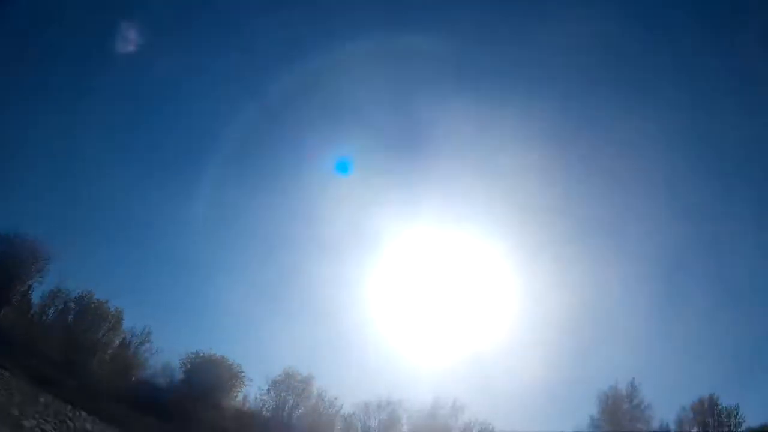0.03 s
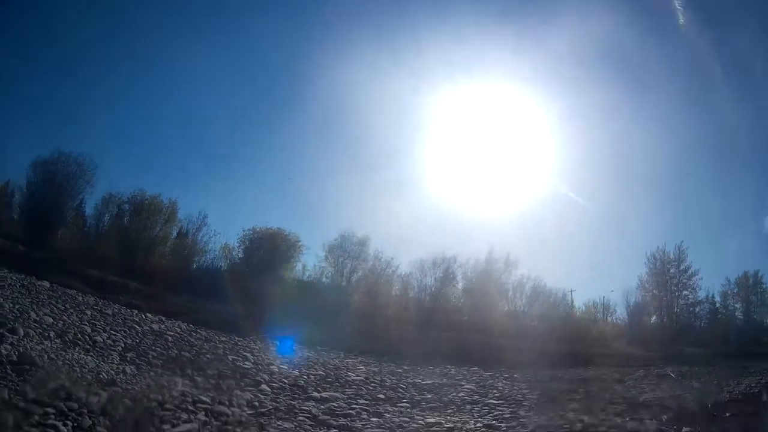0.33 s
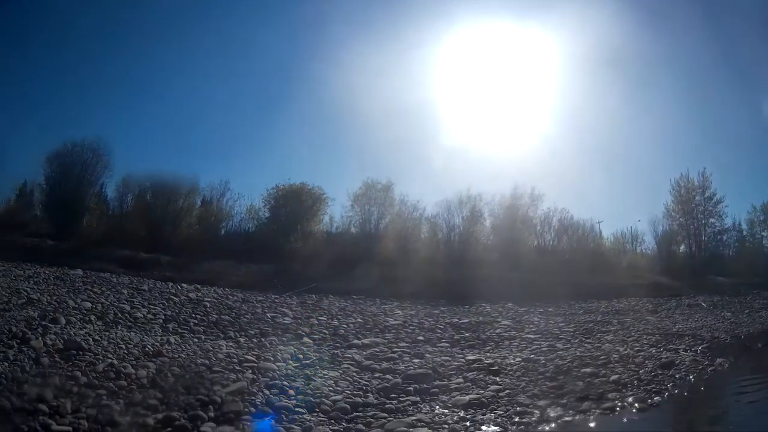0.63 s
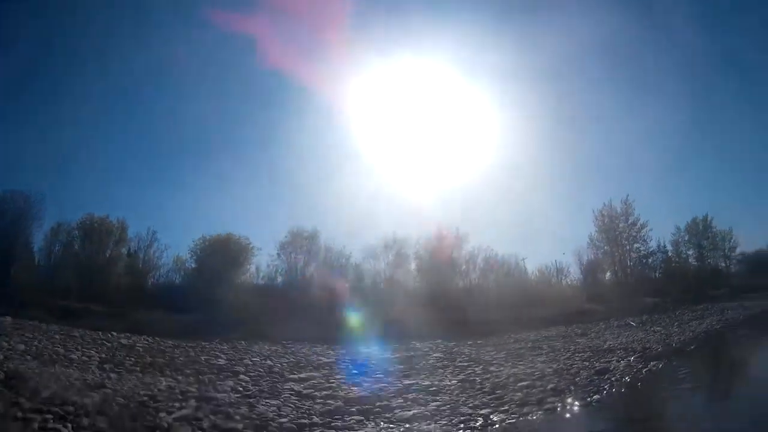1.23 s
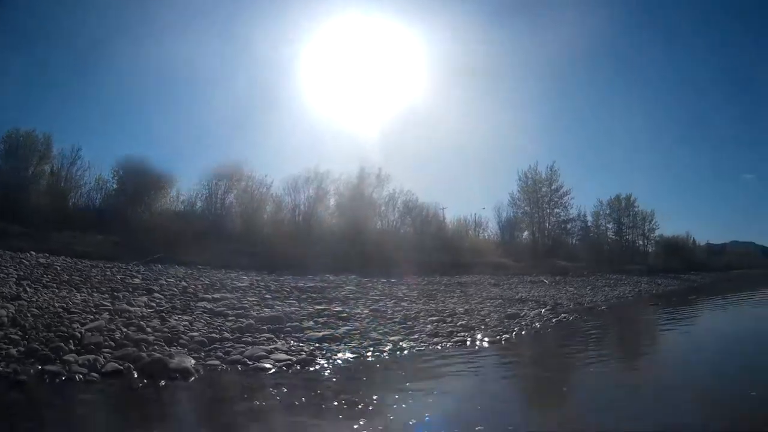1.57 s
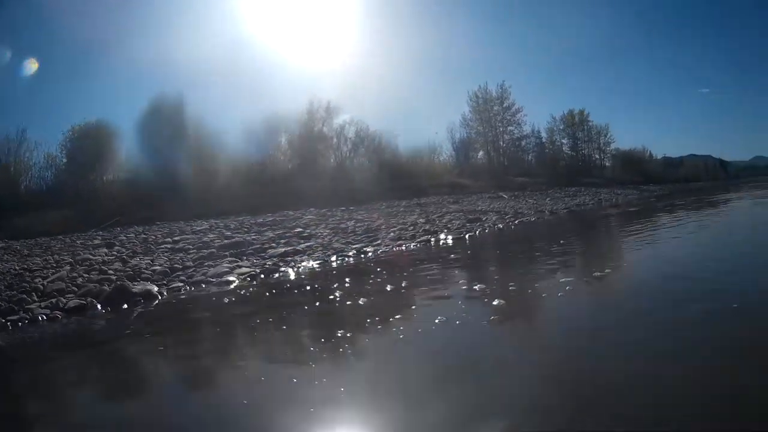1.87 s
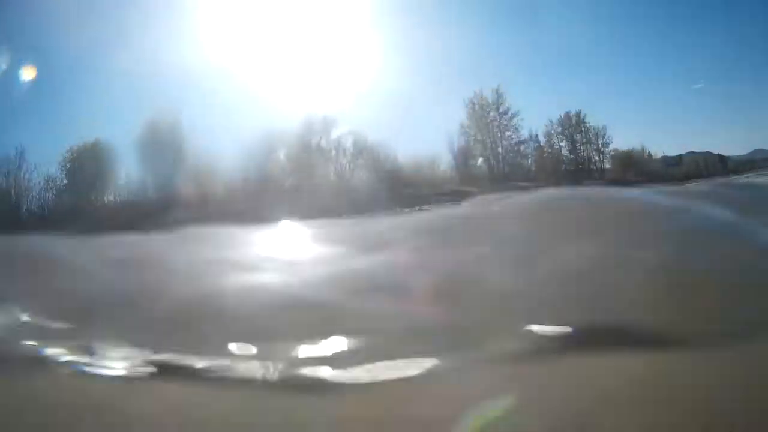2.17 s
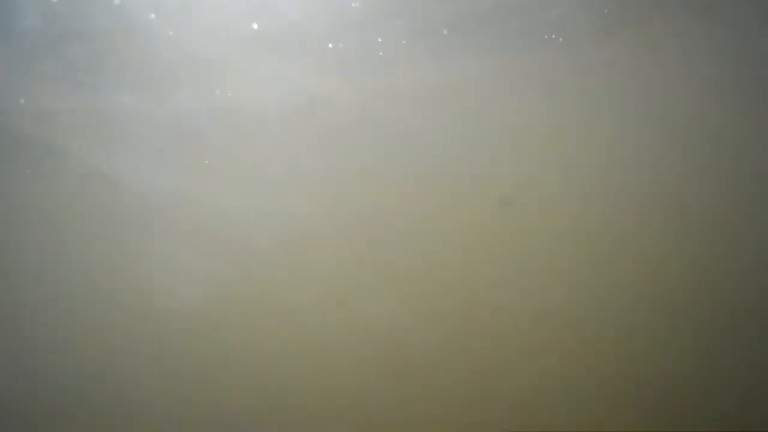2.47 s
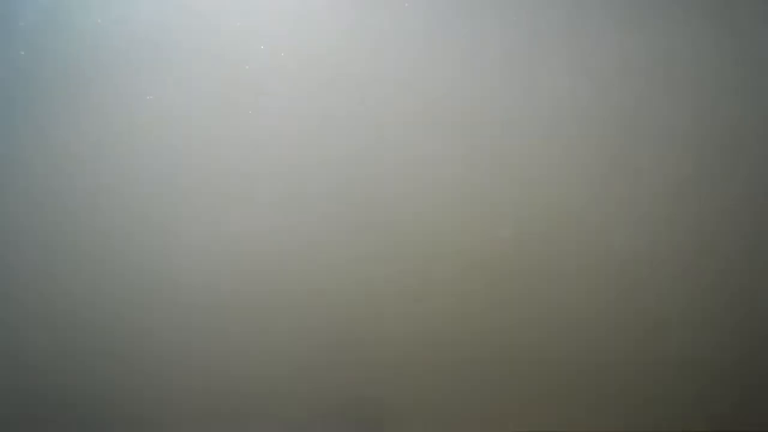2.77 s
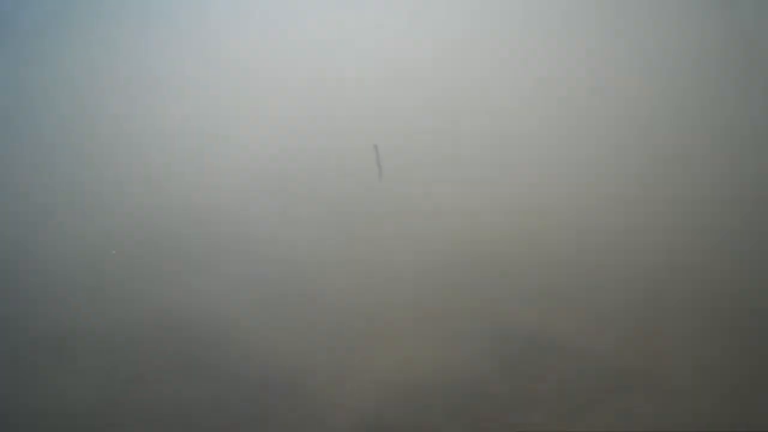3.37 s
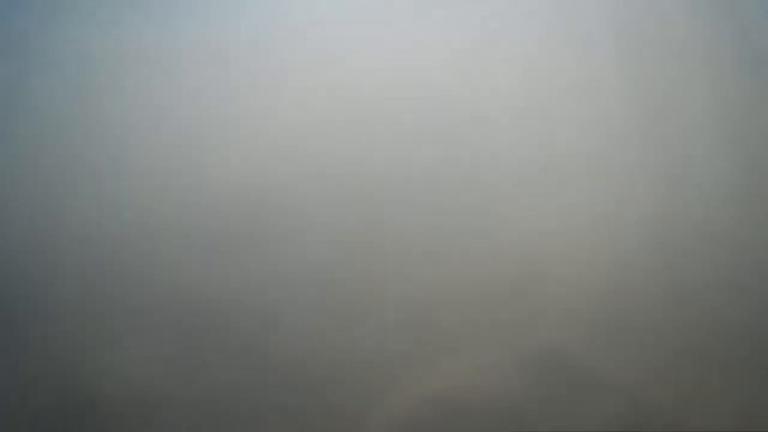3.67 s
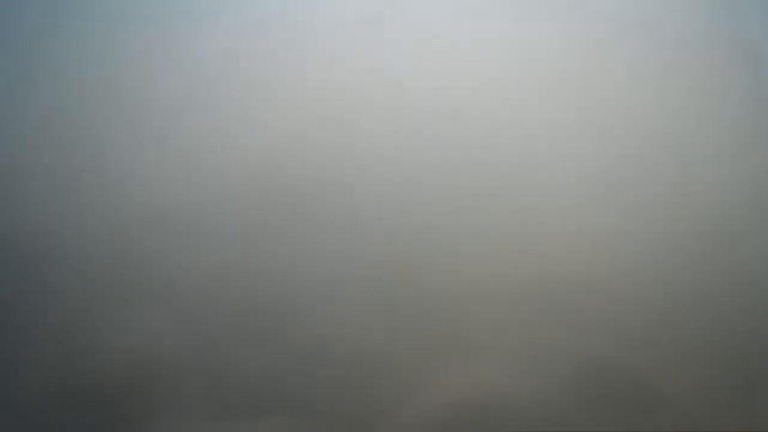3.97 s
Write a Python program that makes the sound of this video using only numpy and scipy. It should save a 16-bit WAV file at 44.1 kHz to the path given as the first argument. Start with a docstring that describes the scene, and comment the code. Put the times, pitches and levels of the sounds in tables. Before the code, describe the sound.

A close splash with bubbling is the main sound. In the first second, fingers knock and rub a camera case, with small creaks, clicks and low rumble. After a lull, the case hits the river at about 2.1 seconds: slaps, ticking spray and gurgling bubbles, fading by 2.8. A quiet, muffled underwater murmur with soft bumps, scuffs and faint hiss continues until 4 seconds.

```python
"""At a river's edge, a camera in a waterproof case is carried to the water and dipped under.
Fingers rub and tap the swaying case, exciting its resonances. The surface slaps it, spray ticks,
air pockets collapse, and bubbles ring as damped oscillators, the trapped air acting as a spring.
Below the surface a muffled rumble, soft bumps and scuffs, and the microphone's hiss remain."""
import sys
import numpy as np
from scipy import signal
from scipy.fft import rfft, irfft
from scipy.io import wavfile
from scipy.ndimage import uniform_filter1d

SR = 44100
rng = np.random.default_rng(int(sys.argv[2]) if len(sys.argv) > 2 else 0)


def output_pcm(signal):
    """Save a mono or channel-first signal as 16-bit PCM at the path in sys.argv[1].

    Samples are clipped to [-1, 1] before scaling.
    """
    pcm = np.clip(np.atleast_2d(signal).T, -1, 1) * 32767
    wavfile.write(sys.argv[1], SR, np.round(pcm).astype(np.int16))


N = 176400
TIME = np.arange(N) / SR

# bubbles pinched off at the case: t/s, f/Hz, level/dB, t60/s, swell/s
BUBBLES = [(2.068, 1360, -9.5, 0.015, 0.00065), (2.076, 1257, -14, 0.044, 0.0018),
           (2.0818, 458, -10, 0.038, 0.0001), (2.089, 1410, -14, 0.017, 0.00033),
           (2.124, 1694, 0, 0.033, 0.00045), (2.13, 1291, -14.5, 0.17, 0.0012),
           (2.1316, 3960, -1.5, 0.0065, 0.00045), (2.1315, 5850, -6, 0.0068, 0.00033),
           (2.1298, 7720, 4, 0.0025, 0.00019), (2.1331, 1950, -5, 0.013, 0.00045),
           (2.1473, 2520, 1, 0.0053, 0.00028), (2.1484, 4020, -2, 0.013, 0.00033),
           (2.1508, 1236, -4.5, 0.028, 0.001), (2.1625, 1154, -6.5, 0.014, .0005),
           (2.1799, 1427, 4.5, 0.021, 0.0021), (2.2005, 3330, -24, 0.015, 0.001),
           (2.2146, 1138, -7, 0.015, 0.00036), (2.219, 1185, -2.5, 0.0092, 0.00009),
           (2.2295, 1790, -1, 0.0073, 0.00044), (2.2608, 1750, -20, 0.015, 0.00058),
           (2.271, 2020, -19.5, 0.029, 0.0015), (2.2725, 3860, -25, 0.014, 0.001),
           (2.3155, 818, -7, 0.028, 0.0001), (2.3217, 3860, -13, 0.015, 0.000043),
           (2.383, 1830, -18, 0.015, 0.00037), (2.3824, 5570, -44, 0.074, 0.0002),
           (2.388, 666, -6.5, 0.0075, 0.00048), (2.417, 1664, -16, 0.02, 0.00056),
           (2.4408, 675, -4, 0.079, 0.00045), (2.458, 3140, -21, 0.013, 0.0006),
           (2.486, 491, -15, 0.12, 0.00047), (2.4847, 4130, -6.5, 0.0043, 0.00017),
           (2.506, 1200, -15.5, 0.023, 0.0023), (2.5174, 1235, -2, 0.023, 0.00033),
           (2.5171, 568, -4.5, 0.029, 0.00055), (2.5181, 866, -7, 0.053, 0.0008),
           (2.5262, 1895, -12, 0.032, 0.0007), (2.534, 1940, -4.5, 0.022, 0.0012),
           (2.534, 2630, -18, 0.02, 0.00047), (2.5576, 1780, -21, 0.028, .001),
           (2.566, 1950, -19, 0.02, 0.00071), (2.5688, 923, -14, 0.03, 0.00087),
           (2.5897, 1580, -26.5, 0.028, 0.00091), (2.624, 1296, -37.5, 0.16, 0.0027),
           (2.6515, 1207, -24, 0.022, 0.00018), (2.7302, 1350, -36, 0.049, 0.00047),
           (2.731, 1920, -44, 0.046, 0.0011), (2.7665, 1420, -22.5, 0.023, 0.00069),
           (3.878, 3630, -34, 0.017, 0.003)]
# water striking the case: t/s, f/Hz, level/dB, t60/s
SLAPS = [(2.0603, 60.3, -4.5, 0.018), (2.076, 138.5, -9, 0.051), (2.083, 51, -0.5, 0.11),
         (2.178, 297, -3.5, 0.007), (2.2190, 435, -24, 0.077), (2.284, 96, -10.5, 0.055),
         (2.3053, 730, -21, 0.027), (2.322, 90, -16, 0.06), (2.346, 76, -15, 0.058),
         (2.4410, 250, -1, 0.0054), (2.4835, 494, 2, 0.0076)]
# collapsing air pockets: t/s, level/dB, build-up/s
GULPS = [(2.3140, -0.5, 0.0008), (2.3341, -3, 0.0048), (2.3429, -10, 0.0035)]
# drops on the case: t/s, level/dB, centre f/Hz
DROPS = [(2.069, -18.5, 3800), (2.0773, -19, 7650), (2.092, -32, 3500), (2.108, -18, 3970),
         (2.12, -12, 10900), (2.1311, 2.5, 8050), (2.1323, -11, 6000), (2.1360, 3, 3060),
         (2.1345, -13, 9000), (2.1480, -7, 5200), (2.158, -18.5, 3880), (2.1725, -17.5, 8700),
         (2.2002, -19, 3480), (2.251, -20, 4440), (2.2608, -23.5, 6400), (2.269, -25.5, 6000),
         (2.3168, -17.5, 5370), (2.3814, -6, 5370), (2.3796, -17, 11200), (2.419, -19, 8200),
         (2.427, -15, 5250), (2.458, -21, 3470), (2.471, -19, 7400), (2.480, -13.5, 5430),
         (2.4846, -15.5, 5800)]
# churning surface: t/s, level/dB
CHURN_LEVEL = [(2.055, -48), (2.072, -27.5), (2.088, -28.5), (2.108, -41.5), (2.135, -29.5), (2.165, -31.5),
               (2.195, -32), (2.245, -39), (2.32, -30), (2.365, -38), (2.405, -49), (2.47, -33.5),
               (2.50, -39), (2.535, -33), (2.58, -40), (2.69, -69)]
# its spectrum: f/Hz, level/dB
CHURN_SPECTRUM = [(110, -2), (220, -5.5), (420, 3), (750, -1), (1400, -3.5), (2050, 0.5), (2400, -14),
                  (2900, -13), (3900, -9.5), (4900, -27.5), (8000, -36), (16000, -44.5)]
# its treble relative to its body: t/s, level/dB
CHURN_TREBLE = [(2.07, 0), (2.16, 7.5), (2.23, -1.5), (2.34, -18.5), (2.47, 6.5), (2.53, -2.5)]

# finger knocks: t/s, level/dB, cutoff f/Hz (higher for a harder tap)
KNOCKS = [(.1370, -10, 2670), (0.1475, -12.5, 1650), (0.2333, -12, 2040), (0.2435, -43, 2000),
          (0.299, -24, 3000), (.3595, -26.5, 4000)]
# normal modes of the case: f/Hz, level/dB, t60/s
CASE_MODES = [(227, -15, 0.025), (422, -2, 0.015), (623, -18, 0.012), (1310, -4, 0.011), (1580, 3, 0.0065),
              (1853, -2.5, 0.014), (3160, -3, 0.0075), (3720, -4, 0.012)]
# rubbing of the hand: t/s, level/dB
RUB_LEVEL = [(0, -35), (.032, -36.5), (.045, -56), (.13, -56), (.19, -46), (.225, -45), (.275, -61),
             (.305, -44.5), (.39, -47.5), (.56, -58), (.74, -57.5), (.825, -45.5), (.88, -47), (.94, -39),
             (.965, -64.5), (1.89, -69), (1.945, -51), (1.98, -71)]
# its broadband spectrum: f/Hz, level/dB
RUB_SPECTRUM = [(100, 10), (430, 4), (700, -10.5), (950, -13.5), (1280, -2), (1550, -7), (1950, -4.5),
                (2600, -9), (3300, -15), (3900, -9), (4700, -14), (11000, -30), (16000, -40.5)]
# hollow resonances of the rubbed case: f/Hz, bandwidth/Hz, level/dB
RUB_RESONANCES = [(403, 117, -7.5), (1303, 150, -9.5), (1970, 380, -9.5), (3890, 230, -16)]
# creaks of the mount: t/s, level/dB
CREAKS = [(0.006, -28), (0.019, -33), (0.035, -32.5), (0.233, -30), (.2435, -38), (0.2566, -33),
          (.292, -34), (0.297, -30.5), (0.355, -34), (0.3599, -23), (0.3727, -30.5), (.379, -36),
          (.4448, -33.5), (.454, -39), (1.936, -39.5), (1.947, -40.5)]
# modes of the mount: f/Hz, level/dB, t60/s
MOUNT_MODES = [(3780, 6.5, 0.0035), (5870, -3.5, 0.007), (7900, -7, 0.0031), (10000, -10, 0.0039)]
# thumps of the hand on the grip: t/s, level/dB, t60/s
THUMPS = [(.1370, 1, 0.032), (0.241, -8.5, 0.026), (0.275, -17, 0.17), (0.351, -11, 0.076),
          (0.434, -7, 0.36), (0.497, -7.5, 0.021)]
# rumble of the moving grip: t/s, level/dB
RUMBLE_LEVEL = [(0, -29.5), (.2, -29.5), (.38, -25), (.52, -24.5), (.63, -37), (.85, -27), (1.05, -49)]
# its spectrum: f/Hz, level/dB
RUMBLE_SPECTRUM = [(10, 2), (25, 8), (55, -6), (110, -14), (300, -62)]

# soft bumps under water: t/s, level/dB, f/Hz
BUMPS = [(2.6709, -26, 210), (3.042, -16, 70.5), (3.192, -19.5, 106.6), (3.2252, -21.5, 242),
         (3.2925, -31.5, 673), (3.325, -25.5, 285), (3.331, -28.5, 294), (3.356, -31.5, 317),
         (3.4715, -19, 218), (3.510, -32, 297), (3.596, -43, 713), (3.718, -35, 203)]
# gritty scuffs under water: t/s, level/dB
SCUFFS = [(2.961, -51), (3.215, -37), (3.291, -38), (3.326, -46), (3.352, -39), (3.384, -47), (3.445, -50),
          (3.507, -45), (3.583, -43), (3.594, -38.5), (3.717, -44.5)]
# their spectrum: f/Hz, level/dB
SCUFF_SPECTRUM = [(100, 2.5), (320, 6), (480, -7), (800, 9.5), (1050, -23), (2000, -11.5), (2500, -22),
                  (3600, -12.5), (4300, -33), (12000, -32)]
# murmur of the current: t/s, level/dB
CURRENT_LEVEL = [(0, -38), (.9, -49), (1.2, -42), (1.8, -44), (2.1, -37), (2.7, -38), (2.9, -38.5),
                 (2.98, -35.5), (3.1, -42), (3.25, -38), (3.6, -37.5), (4, -42.5)]
# its spectrum: f/Hz, level/dB
CURRENT_SPECTRUM = [(20, 5), (45, 5.5), (130, -10), (300, -15), (480, -22), (780, -23.5), (1100, -36),
                    (3000, -49.5), (6000, -57)]
# pressure swings in the case, before limiting: t/s, level/dB
SWAY_LEVEL = [(0, -23.5), (.35, -17.5), (.52, -1), (.68, -13), (.83, 0), (1.0, -21.5), (1.45, -36.5),
              (1.85, -37), (2.3, -21.5), (2.65, -44), (3.2, -30.5), (4, -31.5)]
# their spectrum: f/Hz, level/dB
SWAY_SPECTRUM = [(3, 0), (7, -1.5), (14, -5), (28, -18.5), (55, -48.5), (110, -95.5)]
# dry clicks from steps in the camera's gain: t/s, level/dB
GAIN_CLICKS = [(0.5364, -24.5), (0.6344, -32.5), (0.7716, -15.5), (0.896, -19.5), (.9540, -23.5),
               (0.9776, -29)]
# microphone hiss: t/s, level/dB
HISS_LEVEL = [(0, -59), (.45, -63.5), (.58, -64), (1.07, -64), (1.14, -60.5), (4, -60.5)]
# its spectrum: f/Hz, level/dB
HISS_SPECTRUM = [(590, -34), (1000, 0), (1140, -1), (1390, -4), (1500, -4), (3670, -10), (13300, -11.5),
                 (16900, -16.5)]

GLIDE_PER_S, GLIDE_SPREAD_PER_S = 0.9, 0.6  # fractional rise of a bubble's pitch, and its scatter


def bubbles(roughness=0.26, wobble_hz=314):
    """Volume resonance: trapped air pulsates against the water's mass; torn bubbles ring unevenly."""
    out = np.zeros(N)
    for at, hz, db, t60, swell in BUBBLES:
        glide = GLIDE_PER_S + GLIDE_SPREAD_PER_S * rng.standard_normal()
        add(out, at, amp(db) * lowpass(ring(hz, t60, swell, glide), 1.45 * hz))  # water dulls the onset
    wobble = unit(lowpass(rng.standard_normal(N), wobble_hz))
    return out * (1 + roughness * wobble)


def slaps_and_gulps(wall_hz=904):
    """Transmission loss: the wall dulls the pressure pulses of slapping water and collapsing air."""
    pressure = np.zeros(N)
    for at, hz, db, t60 in SLAPS:
        add(pressure, at, amp(db) * ring(hz, t60, swell=0.16 / hz))
    for at, db, build in GULPS:  # pressure builds, then snaps over
        pressure += amp(db) * np.sign(at - TIME) * np.exp(-abs(at - TIME) / build)
    return signal.sosfilt(signal.cheby1(4, 2, wall_hz, fs=SR, output="sos"), pressure)


def spray(relative_width=0.34):
    """Impact noise: each drop gives a brief band of noise, whose very top the case dulls."""
    out, env = np.zeros(N), burst(t60=0.0064, swell=0.0018)
    env_rms = np.sqrt(np.mean(env ** 2))
    for at, db, hz in DROPS:
        tick = band(hz, hz * relative_width)[:len(env)] * env
        add(out, at, amp(db) * env_rms * unit(tick))
    return lowpass(out, hz=10600)


def churn(bubbles_per_s=2600, spread_db=5.5, split_hz=1600):
    """Superposition: a swarm of bubbles merges into a wash as the surface closes over the case."""
    swarm = np.zeros(N)
    start = CHURN_LEVEL[0][0]
    span = CHURN_LEVEL[-1][0] - start
    for when, pitch, strength in rng.random((int(bubbles_per_s * span), 3)):
        hz = 200 * 40 ** pitch  # log-uniform, 200 to 8000 Hz
        gain = hz * amp(-spread_db * np.log(1 - .97 * strength))
        add(swarm, start + when * span, gain * ring(hz, t60=22 / hz, swell=1 / hz, glide=GLIDE_PER_S))
    wash = colour(swarm, CHURN_SPECTRUM) * np.sqrt(span * SR / N)  # rms 1 while it lasts
    body = signal.sosfiltfilt(signal.butter(2, split_hz, fs=SR, output="sos"), wash)
    return (body + (wash - body) * curve(CHURN_TREBLE)) * curve(CHURN_LEVEL)


def knocks():
    """Impulse response: a tap rings the modes of the case; a harder tap reaches higher ones."""
    out = np.zeros(N)
    for at, db, top_hz in KNOCKS:
        modes = [(hz, level - 10 * np.log10(1 + (hz / top_hz) ** 4), t60)
                 for hz, level, t60 in CASE_MODES]
        strike(out, at, db, modes)
    return out


def creaks():
    """Free vibration: each creak sets the mount's high modes ringing briefly."""
    out = np.zeros(N)
    for at, db in CREAKS:
        strike(out, at, db, MOUNT_MODES)
    return out


def handling(rattle_db=-20.5, scrape_db=-2.5, wall_hz=4300):
    """Forced vibration: friction drives the hollow case, amid knocks and the mount's creaks."""
    taps, mount, friction = knocks(), creaks(), curve(RUB_LEVEL)
    for at, db, _ in KNOCKS:  # the case buzzes on after a knock
        add(friction, at, amp(db + rattle_db) * burst(t60=0.085, swell=0.001))
    hollow = sum(amp(db) * band(hz, width) for hz, width, db in RUB_RESONANCES)
    scrape = amp(scrape_db) * colour(grit(), RUB_SPECTRUM)
    wall = signal.butter(8, wall_hz, fs=SR, output="sos")  # passes little above the top resonance
    return signal.sosfilt(wall, taps + friction * hollow) + friction * scrape + mount


def grip():
    """Structure-borne sound: the moving hand sends rumble and dull thumps through the grip."""
    out = noise(RUMBLE_SPECTRUM, RUMBLE_LEVEL)
    for at, db, t60 in THUMPS:
        add(out, at, amp(db) * burst(t60, swell=0.0027))
    return out


def squeak(at=0.930, length_s=0.0193, from_hz=690, to_hz=883, jitter=0.091, gain_db=-32):
    """Stick-slip oscillation: a fingertip gives one short, unsteady harmonic tone of rising pitch."""
    out, size = np.zeros(N), int(length_s * SR)
    wander = unit(uniform_filter1d(rng.standard_normal(N), size=60))[:size]
    hz = np.linspace(from_hz, to_hz, size) * (1 + jitter * wander)
    phase = 2 * np.pi * np.cumsum(hz) / SR
    tone = sum(amp(db) * np.sin(k * phase) for k, db in enumerate([-7, -0.5, -21, -22], 1))
    add(out, at, amp(gain_db) * np.hanning(size) * tone)
    return out


def current():
    """Flow and contact noise: the current murmurs, bumps softly against the case and scuffs it."""
    out, contact = noise(CURRENT_SPECTRUM, CURRENT_LEVEL), np.zeros(N)
    for at, db, hz in BUMPS:
        add(out, at, amp(db) * ring(hz, t60=0.037, swell=0.23 / hz))
    for at, db in SCUFFS:
        add(contact, at, amp(db) * burst(t60=0.1, swell=0.0013))
    return out + contact * colour(grit(), SCUFF_SPECTRUM)


def sway(limit=0.7):
    """Infrasound: slow pressure swings in the sealed case, softly saturated."""
    pressure = noise(SWAY_SPECTRUM, SWAY_LEVEL)
    return lowpass(limit * np.tanh(pressure / limit), hz=22)


def gain_clicks():
    """Step transients: dry clicks from sudden steps in the camera's gain during the slow sway."""
    out = np.zeros(N)
    for at, db in GAIN_CLICKS:
        add(out, at, amp(db) * fade(t60=0.1))
    return out


def microphone(whine_db=-75.5):
    """Self-noise: broadband hiss and a faint, narrowband electronic whine."""
    return noise(HISS_SPECTRUM, HISS_LEVEL) + amp(whine_db) * band(hz=8710, width_hz=80)


def amp(db):
    """Decibels to amplitude ratio."""
    return 10 ** (np.asarray(db) / 20)


def unit(x):
    """Normalisation to rms 1."""
    return x / np.sqrt(np.mean(x ** 2))


def curve(points):
    """Gain interpolated through (t/s, level/dB) points."""
    return amp(np.interp(TIME, *np.array(points).T))


def colour(x, spectrum):
    """Spectral shaping by (f/Hz, level/dB) points, to rms 1."""
    hz, db = np.array(spectrum).T
    bins_hz = np.maximum(np.arange(N // 2 + 1) * SR / N, 1)
    gain = amp(np.interp(np.log(bins_hz), np.log(hz), db))
    return unit(irfft(rfft(x) * gain, N))


def noise(spectrum, levels):
    """Coloured Gaussian noise under a level curve."""
    return colour(rng.standard_normal(N), spectrum) * curve(levels)


def band(hz, width_hz):
    """Response of one resonator to white noise, rms 1."""
    return unit(signal.lfilter(*signal.iirpeak(hz, hz / width_hz, SR), rng.standard_normal(N)))


def grit(spread_db=4.5):
    """Rough friction: noise whose strength jumps every 64 samples."""
    return rng.standard_normal(N) * np.repeat(amp(spread_db * rng.standard_normal(N // 64 + 1)), 64)[:N]


def fade(t60):
    """Exponential decay, 60 dB in t60 seconds."""
    return np.exp(-np.log(1000) * TIME[:int(2 * t60 * SR) + 2] / t60)


def burst(t60, swell):
    """Exponential decay whose onset has the time constant swell."""
    env = fade(t60)
    return env * (1 - np.exp(-TIME[:len(env)] / swell))


def ring(hz, t60, swell, glide=0):
    """Damped oscillation whose frequency may glide linearly."""
    env = burst(t60, swell)
    t = TIME[:len(env)]
    return env * np.sin(2 * np.pi * hz * t * (1 + glide * t / 2))


def strike(out, at, db, modes):
    """Modal superposition, with level and tuning scattered at each strike."""
    for hz, mode_db, t60 in modes:
        scatter_db, detune = rng.normal(0, [0.5, 0.023])
        add(out, at, amp(db + mode_db + scatter_db) * ring(hz * (1 + detune), t60, swell=0.00043))


def lowpass(x, hz):
    """Second-order attenuation of the treble."""
    return signal.sosfilt(signal.butter(2, hz, fs=SR, output="sos"), x)


def add(out, at, x):
    """Superpose x on out from a time in seconds."""
    i = int(at * SR)
    out[i:i + len(x)] += x[:len(out) - i]


def scene():
    """Superposition of all sources inside the case."""
    background = sway() + gain_clicks() + microphone()
    hand = grip() + handling() + squeak()
    water = current() + bubbles() + slaps_and_gulps() + spray() + churn()
    return (background + hand + water)[None]


def record(dry):
    """Band limiting: the camera cuts off steeply above 16.3 kHz."""
    return signal.sosfilt(signal.ellip(8, .2, 70, 16300, fs=SR, output="sos"), dry)


dry = scene()
out = record(dry)
output_pcm(out)
```